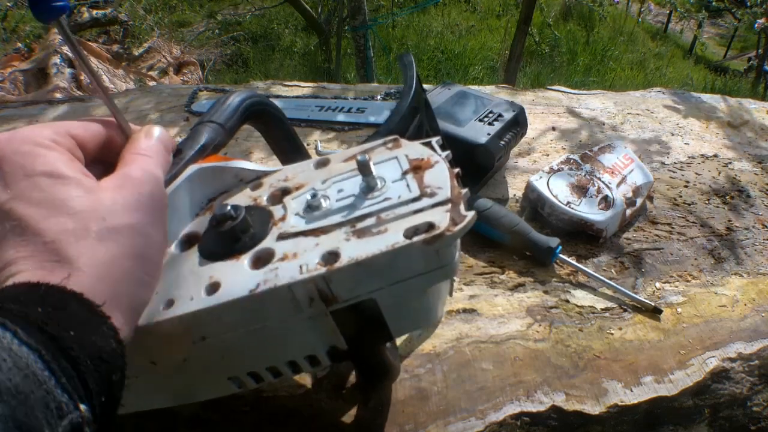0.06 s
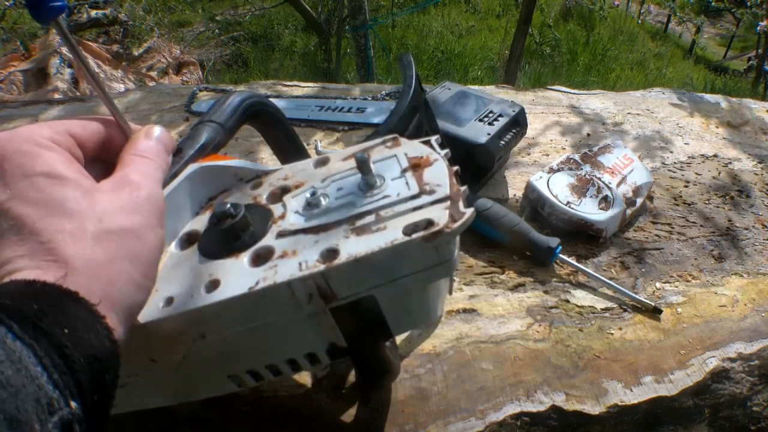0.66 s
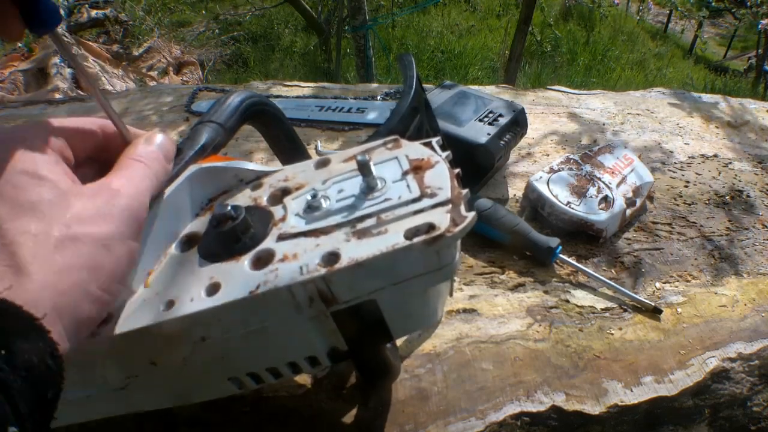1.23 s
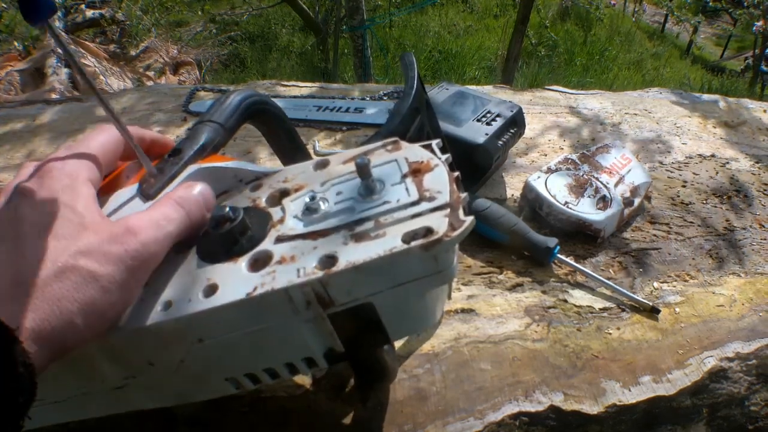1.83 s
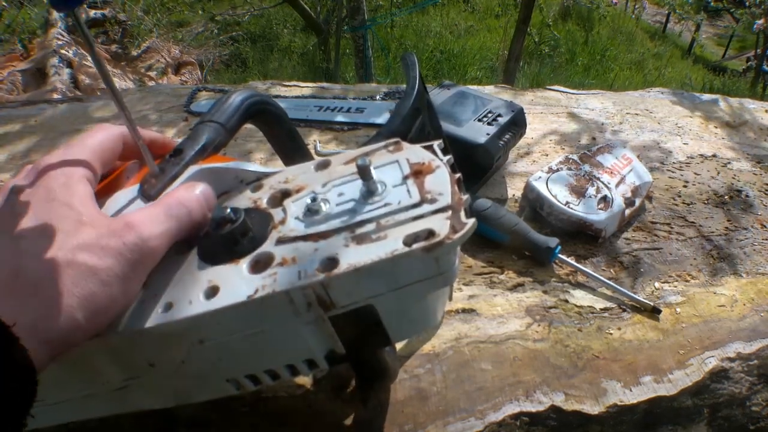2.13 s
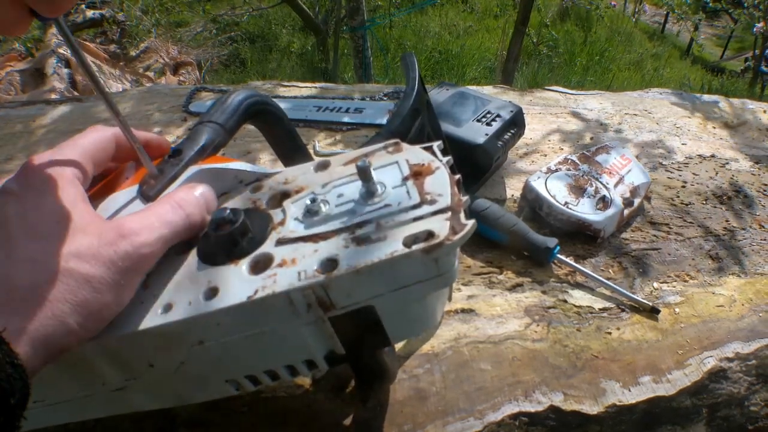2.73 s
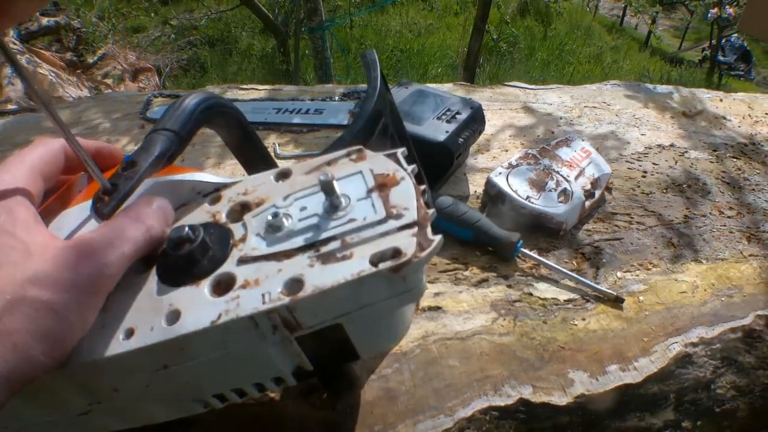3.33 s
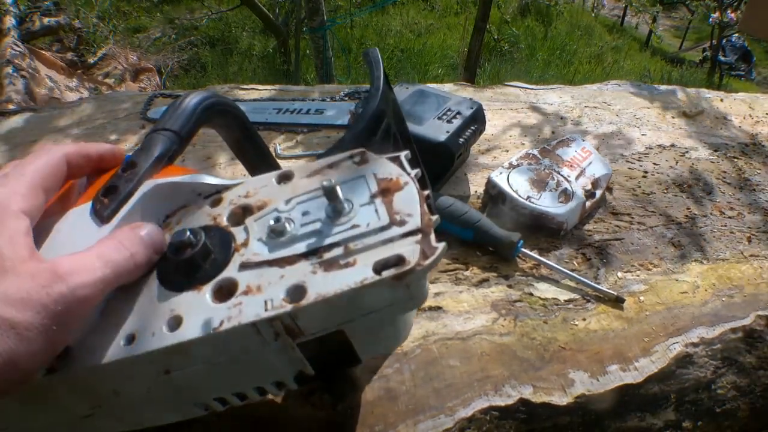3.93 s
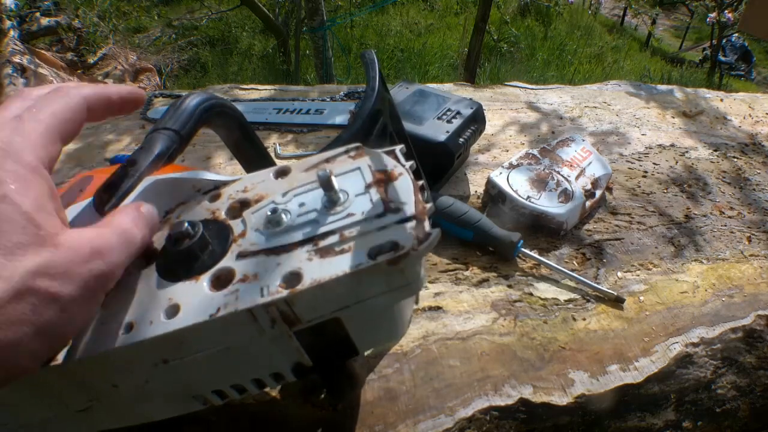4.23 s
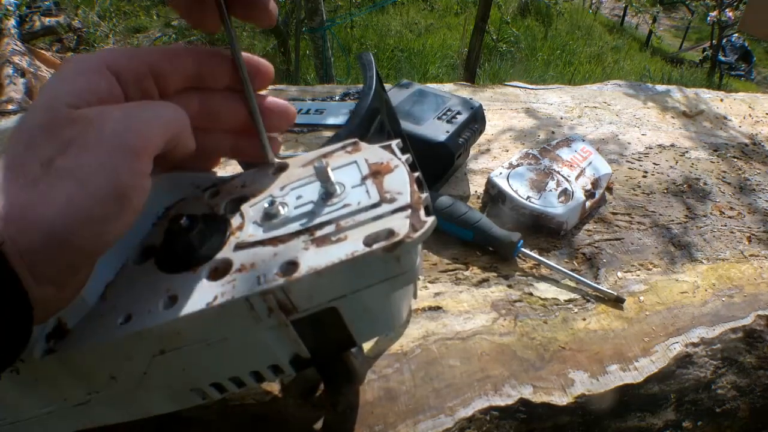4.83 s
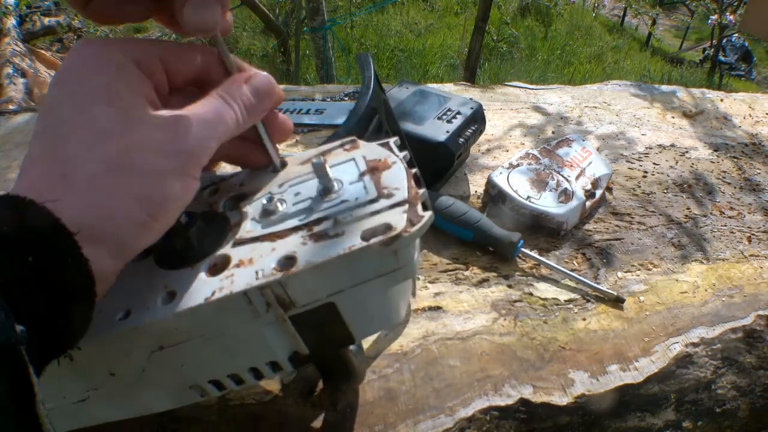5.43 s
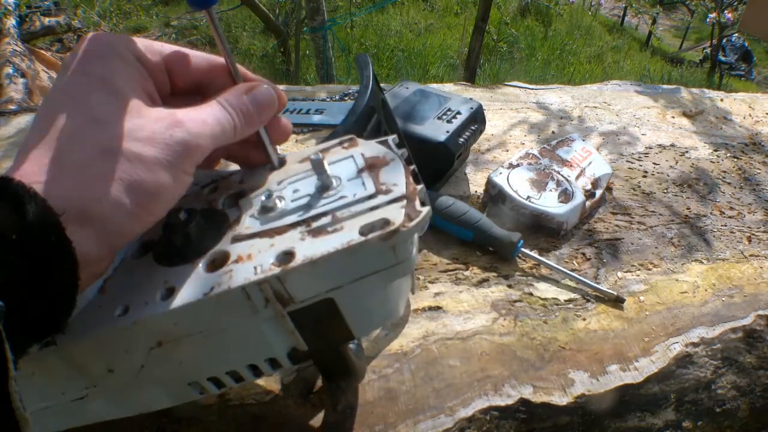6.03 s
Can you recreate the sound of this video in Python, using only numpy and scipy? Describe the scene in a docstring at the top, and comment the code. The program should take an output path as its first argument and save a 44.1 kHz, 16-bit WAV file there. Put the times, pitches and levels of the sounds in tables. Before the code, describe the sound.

Outdoors, a tight screw creaks and squeaks, then a steel tip clicks on metal and plastic as wind buffets the microphone and birds chirp.

```python
"""Screws are undone from a chainsaw's plastic housing, on a log in a garden.
From the start, hands slide over the shell, wind buffets the microphone and songbirds sing in the trees.
At 0.4 s one screw breaks loose with a rasp; near 1.8 s it squeals as its thread sticks and slips.
From 2.3 s a low hum comes and goes. From 3.2 s the steel tip clicks against that screw, then at 5 s
into the next screw head, and the shell knocks hollowly under the taps."""
import sys
import numpy as np
from scipy import signal
from scipy.io import wavfile
from scipy.ndimage import uniform_filter1d, map_coordinates

SR = 44100
rng = np.random.default_rng(int(sys.argv[2]) if len(sys.argv) > 2 else 0)


def file_out(sig):
    """Save sig as 16-bit WAV at sys.argv[1]."""
    # one column per channel
    cols = np.atleast_2d(sig).T
    # limit, then scale
    lim = np.clip(cols, -1, 1)
    pcm = np.round(lim * 32767).astype(np.int16)
    wavfile.write(sys.argv[1], SR, pcm)


N = 272538
TIME = np.arange(N) / SR

# Shoves that break the screw loose: start_s, length_s, level_db
SHOVES = [(.405, 0.0037, -39.5), (.415, 0.014, -35.5), (.433, 0.032, -30), (.463, 0.023, -36),
          (.486, 0.0092, -48.5), (.496, 0.009, -43), (.510, 0.014, -42)]
# The screw's hardest slips: start_s, peak_db
HARD_SLIPS = [(0.4334, -21), (.4362, -22), (0.4392, -24), (0.4444, -27.5), (0.4493, -20), (0.4587, -23.5),
              (0.4627, -29), (0.4734, -23), (0.4965, -27), (0.501, -30.5)]
# How the screw and the tool's shaft ring under load: pitch_hz, width_hz, level_db
TIGHT_SHAFT_RINGS = [(1040, 300, -21), (1620, 1100, -22.5), (2690, 250, -6.5), (3010, 140, -5.5),
                     (3530, 130, -1.5), (4050, 98, -1.5), (4470, 77, 3), (4170, 160, -8.5), (4520, 60, 0),
                     (4690, 80, 7), (5084, 200, 6.5), (5760, 180, 0), (5880, 220, -2), (6670, 400, -21.5),
                     (8100, 330, -17.5), (9000, 530, -8.5), (9390, 410, -21.5), (10500, 600, -30),
                     (12400, 400, -35)]
# The path of the thread's squeal: time_s, pitch_hz, level_db, roughness (0 is smooth, 1 or more is rough)
SQUEAL_PATH = [(1.761, 3790, -68, 0.04), (1.768, 3300, -41, 0), (1.777, 2620, -48.5, 0.04),
               (1.787, 2440, -51, 0.06), (1.812, 2386, -47, 0), (1.829, 2014, -50, 0.1),
               (1.833, 1687, -39.5, 0.21), (1.858, 1560, -33, 0.36), (1.872, 1380, -40, 1.44),
               (1.897, 1790, -38, 0.82), (1.912, 1476, -39, 0.89), (1.965, 1603, -39.5, 0.5),
               (2.01, 1454, -48, 0.8), (2.04, 1490, -39.5, 0.1), (2.054, 1598, -48.5, 0),
               (2.07, 1355, -47.5, 0.05), (2.082, 1303, -85, 0.11)]
# How the post that holds the screw rings: pitch_hz, width_hz, level_db
POST_RINGS = [(1300, 320, -22), (1600, 99, -20), (2386, 220, -0.5), (2696, 197, 3), (2890, 207, 5),
              (3150, 117, 6.5), (3410, 103, 3.5), (3680, 160, -2), (4260, 117, -1.5), (4990, 420, -15),
              (5670, 220, -17.5), (7090, 120, -34.5)]

# The tip meeting screw and shell:
# start_s, steel_db, plastic_db, plastic_low_hz, steel_low_hz, steel_high_hz, skid_s
TAPS = [(3.193, -57.5, -73, 900, 5000, 10500, 0.0023), (3.6138, -42, -49, 1160, 3800, 6940, 0.015),
        (3.6259, -18.5, -31.5, 1270, 2330, 4730, 0.0012), (3.6271, -37, -32.5, 970, 2500, 5960, 0.00051),
        (3.634, -45, -50, 550, 4000, 7500, 0.0041), (4.250, -60.5, -63.5, 440, 2500, 7000, 0.022),
        (5.0014, -19.5, -38.5, 435, 3900, 8850, 0.0019), (5.007, -42.5, -45, 354, 3000, 8000, 0.0061),
        (5.1465, -18.5, -34, 683, 3010, 5870, 0.0059), (5.1484, -14.5, -28, 1390, 3850, 10400, 0.0019),
        (5.153, -32.5, -34.5, 453, 3500, 9500, 0.0047), (5.2397, -21, -50.5, 596, 3830, 8000, 0.00066),
        (5.2413, -12, -40.5, 992, 4700, 8080, 0.0015), (5.2471, -35, -46.5, 605, 3540, 8000, 0.0028)]
NEXT_SCREW_S = 4.5   # from here on the tip works on the second screw
# How the first screw rings at a tap: pitch_hz, width_hz, level_db
FIRST_SCREW_RINGS = [(1280, 93, 9.5), (2740, 250, -2.5), (3180, 380, -4.5), (4250, 240, 3), (5700, 670, -6),
                     (6360, 300, 0), (6800, 200, 1.5), (8200, 330, -2), (10360, 850, -12)]
# How the second screw rings at a tap: pitch_hz, width_hz, level_db
SECOND_SCREW_RINGS = [(3227, 200, 0), (3836, 130, 4), (4460, 650, -2), (5550, 410, 2.5), (6270, 600, -1),
                      (6800, 260, 3.5), (7930, 630, -3), (8630, 370, 1), (9390, 400, -3), (10440, 490, -1),
                      (12600, 400, -19), (14100, 500, -9)]
# How the plastic shell rings under both: pitch_hz, width_hz, level_db
SHELL_RINGS = [(630, 53, 9), (850, 620, 1), (1210, 300, -1), (1724, 200, 3), (2100, 190, -1.5),
               (2740, 530, -7)]
# Hollow knocks of the shell: start_s, length_s, first_hz, last_hz, level_db
KNOCKS = [(3.627, 0.035, 805, 623, -63), (4.248, 0.019, 723, 608, -57), (4.999, 0.025, 1114, 480, -45),
          (5.144, 0.02, 1003, 488, -43.5), (5.255, 0.0064, 850, 520, -49.5)]

# Strokes of skin and sleeve over the shell: start_s, length_s, level_db, first_hz, last_hz, width_octaves
STROKES = [(.01, 0.038, -65, 2960, 4500, 3.3), (.12, 0.17, -80.5, 4360, 3940, 0.84),
           (1.225, 0.02, -66, 7800, 6270, 2.7), (1.252, 0.019, -68.5, 4540, 3600, 1.1),
           (1.499, 0.041, -67.5, 7000, 5900, 2), (1.547, 0.0054, -66.5, 1380, 1240, 0.75),
           (2.336, 0.079, -70, 6150, 8000, 2.4), (2.446, 0.062, -68.5, 8500, 8900, 2.1),
           (2.493, 0.035, -58, 7450, 5170, 1.8), (4.425, 0.032, -72, 8000, 7950, 2.1),
           (4.48, 0.17, -80.5, 6450, 7450, 1.25), (4.535, 0.018, -74.5, 9800, 9500, 0.95),
           (4.7, 0.23, -82.5, 7000, 6000, 1.2), (5.455, .057, -78, 7550, 7300, 1.3),
           (5.872, 0.14, -75, 5470, 7000, 1.7), (6.01, 0.041, -61, 7850, 6450, 0.84),
           (6.029, 0.15, -62.5, 3500, 3320, 1.83)]
# How the shell rings when skin rubs it: pitch_hz, width_hz, level_db
RUB_RINGS = [(1310, 790, -4), (2450, 1200, -4.5), (3804, 2000, -2.5), (4700, 880, 1.5), (5640, 1500, 0),
             (6500, 1200, 2), (7330, 890, -1.5), (9050, 1600, -9), (10740, 990, -11.5)]
# The steel shaft sliding against the housing: start_s, length_s, level_db
SLIDES = [(1.25, 0.1, -75), (1.38, 0.051, -65), (1.464, 0.0045, -61.5), (1.485, 0.032, -64.5),
          (3.9, 0.22, -74), (6.02, 0.18, -66.5)]
# How the shaft rings when held loosely: pitch_hz, width_hz, level_db
LOOSE_SHAFT_RINGS = [(2190, 740, -4), (4130, 170, -3.5), (4700, 240, 0.5), (5110, 170, 1.5), (5640, 84, 1),
                     (6100, 74, 4.5), (6710, 82, 7), (7030, 89, -4.5), (7800, 370, -11.5)]
# Brief swells of the low hum: start_s, length_s, level_db
HUMS = [(2.345, 0.03, -56), (3.05, 0.013, -56), (3.84, 0.041, -64), (4.5, 0.055, -57),
        (5.065, 0.028, -54.5), (5.235, 0.034, -51.5), (5.39, 0.026, -56.5), (5.55, 0.097, -56.5),
        (5.94, 0.035, -59)]

# Gusts that hit the microphone: start_s, length_s, buffet_db, eddy_db
GUSTS = [(.005, 0.045, -32, -46), (0.357, 0.011, -41, -61.5), (0.619, 0.049, -31, -55.5),
         (.725, 0.079, -26.5, -51), (0.931, 0.094, -40, -61.5), (1.222, 0.027, -27.5, -47.5),
         (1.35, 0.16, -46, -68), (1.828, 0.06, -32.5, -51.5), (1.913, 0.053, -24.5, -48.5),
         (2.035, 0.021, -23, -47.5), (2.102, .18, -26.5, -51), (2.333, 0.033, -33, -54.5),
         (3.039, 0.03, -39.5, -63), (3.892, 0.028, -43.5, -61.5), (4.515, 0.035, -45, -63.5),
         (4.668, 0.051, -29.5, -50), (4.853, 0.019, -34.5, -54), (4.92, 0.01, -33.5, -56),
         (5.15, 0.029, -39, -56), (5.24, 0.048, -40, -62), (5.4, 0.016, -36, -53),
         (5.455, 0.36, -37, -59.5), (5.901, 0.15, -36.5, -56), (6.134, 0.066, -41.5, -57.5)]
# The breeze between gusts: time_s, buffet_db
BREEZE = [(0, -53), (.25, -53), (.9, -42.5), (1.35, -49), (1.6, -58.5), (2.35, -53), (2.77, -45.5),
          (2.95, -51.5), (3.35, -51.5), (3.75, -56.5), (4.2, -50), (4.43, -54.5), (4.8, -44.5),
          (5.02, -55.5), (5.34, -52), (6.18, -48)]
# The deep rumble of buffeting air: pitch_hz, relative_db
BUFFET_SPECTRUM = [(14, 9.5), (22, 2), (32, -3.5), (45, -6), (66, -12.5)]
# The higher rush of eddies, tiny whirls of air: pitch_hz, relative_db
EDDY_SPECTRUM = [(115, 2.5), (150, 1), (220, -16.5), (400, -18.5), (700, -27), (1300, -40), (2600, -47.5)]
# Songbird notes: start_s, length_s, first_hz, middle_hz, last_hz, level_db
BIRD_NOTES = [(0.279, 0.05, 4040, 4083, 4340, -66.5), (0.612, 0.17, 2264, 2507, 2780, -62.5),
              (0.615, 0.036, 3120, 3240, 3430, -71.5), (0.698, 0.032, 3090, 3220, 3300, -68.5),
              (0.771, 0.085, 1827, 1610, 1560, -67.5), (0.984, 0.083, 2440, 1967, 1610, -69),
              (1.062, 0.06, 1940, 2006, 1800, -66), (2.25, 0.052, 5130, 5270, 5220, -71),
              (2.605, 0.1, 6680, 6750, 6910, -77), (2.701, 0.075, 7700, 7560, 7500, -83.5),
              (2.827, 0.1, 7060, 5960, 5400, -76.5), (2.851, 0.075, 3170, 3320, 3310, -61),
              (2.956, 0.031, 4060, 3460, 3860, -69), (2.998, 0.033, 4280, 3990, 3340, -68.5),
              (3.566, 0.045, 4550, 4010, 3780, -60.5), (3.627, 0.12, 4250, 4250, 4320, -62.5),
              (3.721, 0.057, 5100, 4695, 4900, -62.5), (3.732, 0.068, 4320, 3870, 3490, -67),
              (3.81, 0.029, 3960, 3895, 3530, -60.5), (3.832, 0.163, 3110, 3150, 3100, -74.5),
              (4.007, 0.056, 4000, 3895, 3600, -69), (4.269, 0.026, 3770, 4490, 5600, -63),
              (4.28, 0.042, 4190, 3890, 3800, -67), (4.303, 0.04, 3900, 3370, 4130, -65.5),
              (4.344, 0.024, 3810, 3430, 2900, -70), (4.798, 0.046, 2490, 2390, 2090, -68.5),
              (4.99, 0.055, 2364, 2520, 2350, -72.5), (5.022, 0.037, 5970, 5750, 5730, -72.5),
              (5.169, 0.14, 1642, 1860, 1993, -65.5), (5.301, 0.153, 1957, 2027, 1935, -54.5),
              (5.509, 0.047, 2060, 2018, 1950, -74.5), (5.632, 0.063, 2520, 2440, 2396, -53.5),
              (5.69, 0.033, 2386, 1995, 1840, -67.5), (5.758, 0.068, 2435, 2430, 2375, -68.5),
              (5.825, 0.13, 2400, 2481, 2360, -63)]
# The soft hiss of the garden air: pitch_hz, relative_db
GARDEN_SPECTRUM = [(100, -3), (250, -3.5), (600, -3.5), (1200, -9.5), (2300, -18.5), (4000, -22.5),
                   (6000, -37.5), (8000, -36), (10500, -49.5), (12000, -50), (14500, -52)]


def screw_rasp(catches_per_s=380, unevenness=0.36, catch_depth=0.88):
    """The stuck screw gives way in a buzzing run of catches, each a shower of slips that ring the shaft."""
    catch_count = np.cumsum(catches_per_s * (1 + unevenness * drift(150))) / SR
    catching = 1 - catch_depth * np.sqrt(catch_count % 1)
    slips = catching * tiny_slips(per_s=6000, spread_db=2)
    grind = steady(resonate(slips, TIGHT_SHAFT_RINGS), window_s=0.005)
    jerks = np.zeros(N)
    for start_s, peak_db in HARD_SLIPS:
        jerks[round(start_s * SR)] = from_db(peak_db)
    jerk_peak = np.abs(resonate(signal.unit_impulse(SR // 50), TIGHT_SHAFT_RINGS)).max()
    shoving = swells(SHOVES, attack_s=0.003, release_s=0.013)[0]
    creak = grind * shoving + resonate(jerks, TIGHT_SHAFT_RINGS) / jerk_peak
    creak = cut(creak, [6750, 7650], "bandstop", order=1)   # a gap between two groups of ringing pitches
    creak = cut(creak, 450, "high")
    return cut(creak, [11000, 11900], "bandstop", order=1)


def thread_squeal(jitter=0.0665, warble=0.0499, grit=0.76, flutter_db=1.5):
    """The thread sticks and slips so fast that it whistles, falls in pitch, then breaks into a creak."""
    pitch_hz, level_db, roughness = curves(SQUEAL_PATH)
    roughness = np.clip(roughness, 0, 1)
    wobble = roughness * (jitter * drift(260) + warble * drift(45))
    phase = phase_of(pitch_hz * (1 + wobble))
    slips = np.sin(phase) + from_db(-3) * np.sin(2 * phase) + from_db(-17) * np.sin(3 * phase)
    tone = steady(resonate(slips, POST_RINGS), window_s=0.0059)
    scrape = steady(resonate(tiny_slips(per_s=2700, spread_db=-7.5), POST_RINGS), window_s=0.012)
    scrape_share = np.clip(grit * roughness, 0, 0.7)
    voice = np.sqrt(1 - scrape_share) * tone + np.sqrt(scrape_share) * scrape
    turning = (TIME >= SQUEAL_PATH[0][0]) & (TIME <= SQUEAL_PATH[-1][0])
    loudness = from_db(level_db + flutter_db * np.sqrt(roughness) * drift(200))
    return cut(voice * turning * loudness, [1300, 7200], "band", order=4)


def tip_taps(fade_db=-21, fade_s=0.035, tail_db=-46, tail_s=0.13, blow=4.0):
    """The tip strikes and skids, ringing steel and plastic; each click trails off in a brief, faint hiss."""
    out, t = np.zeros(N), TIME[:SR // 4]
    hiss = from_db(fade_db - 60 * t / fade_s) + from_db(tail_db - 60 * t / tail_s)
    for start_s, steel_db, plastic_db, plastic_low_hz, steel_low_hz, steel_high_hz, skid_s in TAPS:
        skid = np.exp(-(t / skid_s) ** 2)
        force = rng.standard_normal(len(t)) * (skid + hiss)
        force[0] += blow
        screw_rings = FIRST_SCREW_RINGS if start_s < NEXT_SCREW_S else SECOND_SCREW_RINGS
        steel = resonate(cut(force, [steel_low_hz, steel_high_hz], "band"), screw_rings)
        plastic = resonate(cut(force, [plastic_low_hz, 5000], "band", order=3), SHELL_RINGS)
        for ring, peak_db in ((steel, steel_db), (plastic, plastic_db)):
            out[round(start_s * SR):][:len(t)] += from_db(peak_db) * ring / np.abs(ring).max()
    return out


def shell_knocks(fade_db=16, sag=3.0, overtone_db=-10):
    """Waves spread through the bending shell, the high ones first, so each hollow knock falls in pitch."""
    out = np.zeros(N)
    for start_s, length_s, first_hz, last_hz, level_db in KNOCKS:
        progress = np.linspace(0, 1, int(length_s * SR))
        phase = phase_of(last_hz + (first_hz - last_hz) * np.exp(-sag * progress))
        tone = np.sin(phase) + from_db(overtone_db) * np.sin(2 * phase)
        loudness = from_db(level_db - fade_db * progress ** 2) * signal.windows.tukey(len(tone), 0.2)
        out[round(start_s * SR):][:len(tone)] += loudness * tone
    return out


def hands(grip_db=-82.5, flutter_db=1.7):
    """Skin catches on the dirty shell in tiny slips; each stroke gets brighter or duller as it goes."""
    rubbing = resonate(tiny_slips(per_s=5500, spread_db=-3), RUB_RINGS)
    friction = unit_level(cut(rubbing, 10800, "low", order=8))
    out = from_db(grip_db) * friction   # the hand never rests entirely
    for start_s, length_s, level_db, first_hz, last_hz, width_octaves in STROKES:
        edges = 2 ** (np.array([-0.5, 0.5]) * width_octaves)
        early, late = (unit_level(cut(friction, hz * edges, "band")) for hz in (first_hz, last_hz))
        progress = np.clip((TIME - start_s) / length_s, 0, 1)
        loudness = swells([(start_s, length_s, level_db)], attack_s=0.025, release_s=0.023)[0]
        out = out + loudness * ((1 - progress) * early + progress * late)
    return out * from_db(flutter_db * drift(25))


def shaft_slides():
    """Grit under the sliding shaft makes it ring thinly."""
    ring = steady(resonate(tiny_slips(per_s=4000, spread_db=0), LOOSE_SHAFT_RINGS), window_s=0.046)
    return swells(SLIDES, attack_s=0.039, release_s=0.022)[0] * ring


def low_hum(pitch_hz=140.1, waver=0.044):
    """A nearly pure low tone with an unsteady pitch comes and goes."""
    phase = phase_of(pitch_hz * (1 + waver * drift(21)))
    tone = np.sin(phase) + from_db(-14) * np.sin(2 * phase) + from_db(-18) * np.sin(3 * phase)
    return swells(HUMS, attack_s=0.015, release_s=0.05)[0] * unit_level(tone)


def wind(breeze_eddy_db=-20, swirl_db=-10, swirl_band_hz=(57, 99.8), swirl_growth=0.52):
    """Air pushes on the microphone in lumps: slow buffets, mid-sized swirls and small eddies on top."""
    breeze = from_db(curves(BREEZE)[0])
    gust_buffet, gust_eddy = swells(GUSTS, attack_s=0.011, release_s=0.048)
    buffet_gain = np.hypot(gust_buffet, breeze)
    eddy_gain = np.hypot(gust_eddy, breeze * from_db(breeze_eddy_db))
    buffet = steady(shaped_noise(BUFFET_SPECTRUM, flicker_db=2.5), window_s=0.054)
    swirls = steady(cut(rng.standard_normal(N), swirl_band_hz, "band"), window_s=0.22)
    eddies = steady(shaped_noise(EDDY_SPECTRUM, flicker_db=6), window_s=0.05)
    eddies *= np.sqrt((1 + buffet ** 2) / 2)   # eddies ride on the buffets
    build_up = (buffet_gain / np.median(buffet_gain)) ** swirl_growth   # strong gusts swirl most
    swirl_gain = from_db(swirl_db) * np.sqrt(buffet_gain * eddy_gain) * build_up
    return buffet_gain * buffet + swirl_gain * swirls + eddy_gain * eddies


def birds(notes, waver=0.012, flutter_db=4.0, buzzy_hz=3600, husk_db=-14, husk_hz=260):
    """Each note is a husky whistle bending through three pitches; short, high ones flutter most."""
    out, wobble, flutter = np.zeros(N), drift(170), drift(90)
    husk = from_db(husk_db) * unit_level(cut(rng.standard_normal((2, N)), husk_hz, "low"))
    for start_s, length_s, first_hz, middle_hz, last_hz, level_db in notes:
        progress = np.linspace(0, 1, int(length_s * SR))
        span = slice(round(start_s * SR), round(start_s * SR) + len(progress))
        pitch_hz = np.polyval(np.polyfit([0, 0.5, 1], [first_hz, middle_hz, last_hz], 2), progress)
        buzz = min(middle_hz / buzzy_hz, 1) ** 2 * np.clip(0.089 / length_s, 0.8, 1.2)
        phase = phase_of(pitch_hz * (1 + waver * buzz * wobble[span]))
        whistle = (1 + husk[0, span]) * np.sin(phase) + husk[1, span] * np.cos(phase)
        arch = np.sqrt(2) * np.sin(np.pi * progress)
        out[span] += from_db(level_db + flutter_db * buzz * flutter[span]) * arch * whistle
    return out


def far_twitters(per_s=22, level_db=-86, centre_hz=4300, spread_octaves=0.83, length_s=0.07, bend=0.12):
    """Distant birds sing faint notes at random times and pitches, each sliding up or down."""
    notes = []
    for when, height, tilt in rng.random((int(per_s * N / SR), 3)):
        start_s = when * (N / SR - 2 * length_s)
        pitch_hz = centre_hz * 2 ** (spread_octaves * (2 * height - 1))
        slide_hz = pitch_hz * bend * (2 * tilt - 1)
        notes.append((start_s, length_s, pitch_hz + slide_hz, pitch_hz, pitch_hz - slide_hz, level_db))
    return birds(notes)


def tree_echoes(song, leaves_s=0.088, trunks_s=0.45, trunks_db=-13):
    """Leaves nearby blur each note; distant trunks add a thin trail of echoes."""
    t = TIME[:SR]
    fading = from_db(-60 * t / leaves_s) + from_db(trunks_db - 60 * t / trunks_s)
    echoes = rng.standard_normal(SR) * (rng.random(SR) < 2500 / SR)   # about 2500 a second
    echoes *= fading * (t > 0.001)
    return signal.fftconvolve(song, echoes / np.sqrt(np.sum(echoes ** 2)))[:N]


def garden_air(level_db=-77):
    """The air all round makes a faint, flickering hiss."""
    return from_db(level_db) * shaped_noise(GARDEN_SPECTRUM, flicker_db=2.7)


def tiny_slips(per_s, spread_db):
    """Rubbing surfaces slip in tiny random clicks; spread_db makes their strength uneven."""
    happens = rng.random(N) < per_s / SR
    strength = from_db(spread_db * np.minimum(rng.exponential(1, N), 4))
    return happens * strength * rng.choice([-1, 1], N)


def resonate(force, rings):
    """A pushed object rings at its own pitches, added with alternating sign; narrow ones last longer."""
    out = 0
    for k, (pitch_hz, width_hz, level_db) in enumerate(rings):
        decay = np.exp(-np.pi * width_hz / SR)
        feedback = [1, -2 * decay * np.cos(2 * np.pi * pitch_hz / SR), decay ** 2]
        ring = signal.lfilter([1, 0, -1], feedback, force + 1e-18) * (1 - decay ** 2) / 2
        out = out + (-1) ** k * from_db(level_db) * ring
    return out


def swells(rows, attack_s, release_s):
    """One gain curve per dB column: each event rises 20 dB per attack_s, holds, falls 20 per release_s."""
    power = np.zeros((len(rows[0]) - 2, N))
    for start_s, length_s, *levels_db in rows:
        end_s = start_s + length_s
        span = slice(*np.searchsorted(TIME, [start_s - 4 * attack_s, end_s + 4 * release_s]))
        before = np.maximum(start_s - TIME[span], 0) / attack_s
        after = np.maximum(TIME[span] - end_s, 0) / release_s
        power[:, span] += from_db(np.array(levels_db)[:, None] - 20 * (before + after)) ** 2
    return np.sqrt(power)


def shaped_noise(spectrum, flicker_db):
    """Noise of level 1, built from bands about half an octave wide that each flicker."""
    hz, db = np.transpose(spectrum)
    edges = np.geomspace(hz[0], hz[-1], int(2 * np.log2(hz[-1] / hz[0])) + 2)
    white, out = rng.standard_normal((2, N)), 0
    for k, band in enumerate(zip(edges, edges[1:])):
        level_db = np.interp(np.mean(np.log(band)), np.log(hz), db)
        out = out + cut(white[k % 2], band, "band") * from_db(level_db + flicker_db * drift(14))
    return unit_level(out)


def drift(per_s):
    """A random wander of level 1; a higher per_s makes it quicker."""
    points = rng.standard_normal(int(per_s * N / SR * 2) + 4)
    return unit_level(map_coordinates(points, [TIME * per_s * 2], order=1))


def curves(rows):
    """Join a table's points with straight lines: one curve for each column after the time."""
    time_s, *columns = np.transpose(rows)
    return [np.interp(TIME, time_s, column) for column in columns]


def cut(x, hz, kind, order=2):
    """Keep the "low" part, the "high" part or a "band" of a sound; "bandstop" removes a band."""
    return signal.sosfilt(signal.butter(order, hz, kind, fs=SR, output="sos"), x + 1e-18)


def steady(x, window_s):
    """Hold the level near 1 over each short stretch of time."""
    power = uniform_filter1d(x ** 2, int(window_s * SR))
    return x / np.sqrt(np.abs(power) + 1e-12)


def unit_level(x):
    """Scale a signal so that its average level (rms) is 1."""
    return x / np.sqrt(np.mean(x ** 2) + 1e-20)


def phase_of(pitch_hz):
    """Turn a changing pitch into the growing angle of a sine wave."""
    return 2 * np.pi * np.cumsum(pitch_hz) / SR


def from_db(db):
    """Turn decibels into a number to multiply by."""
    return 10 ** (np.asarray(db) / 20)


def scene(near_bird_db=-61.5):
    """The work close by, the birds beyond, the air all round; faint birds come mostly as echoes."""
    near = birds([note for note in BIRD_NOTES if note[-1] > near_bird_db])
    far = birds([note for note in BIRD_NOTES if note[-1] <= near_bird_db])
    echoes = tree_echoes(from_db(-5.5) * near + far + far_twitters())
    song = from_db(1) * near + from_db(-1.5) * far + echoes
    air = garden_air()
    work = screw_rasp() + thread_squeal() + tip_taps() + shell_knocks() + hands() + shaft_slides()
    return (work + low_hum() + wind() + song + air)[None]


def record(dry, cutoff_hz=14700):
    """The top of the treble is cut."""
    return signal.sosfilt(signal.ellip(10, 0.1, 80, cutoff_hz, fs=SR, output="sos"), dry)


dry = scene()
out = record(dry)
file_out(out)
```